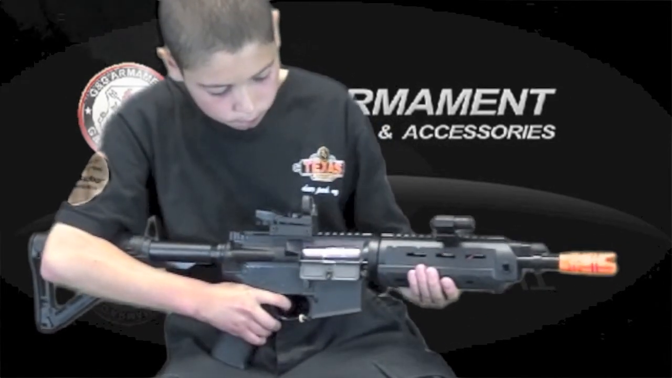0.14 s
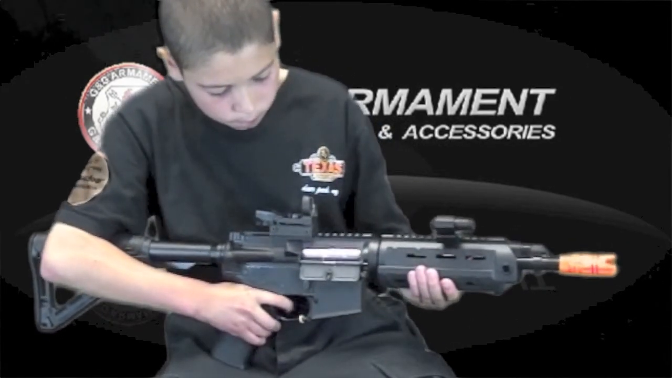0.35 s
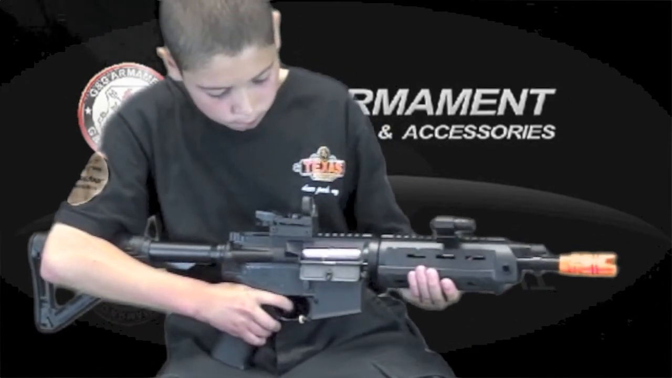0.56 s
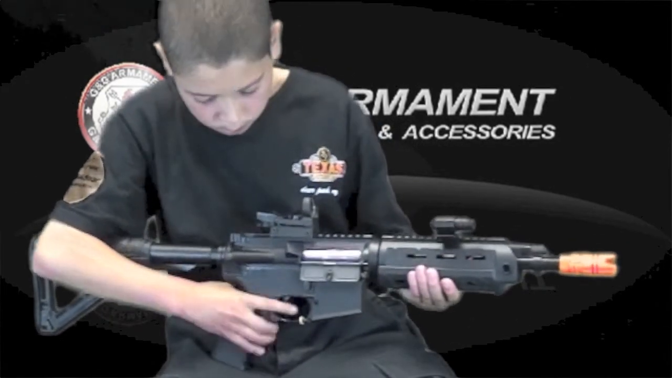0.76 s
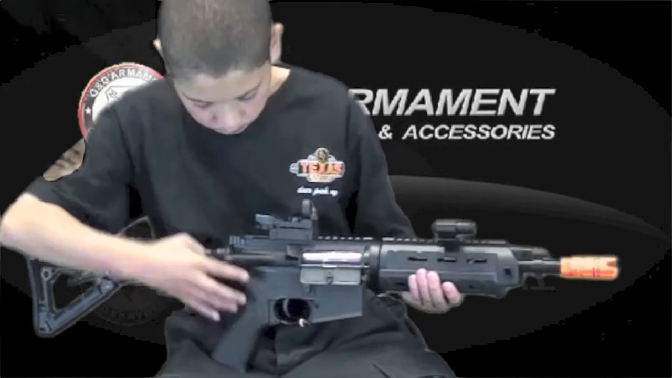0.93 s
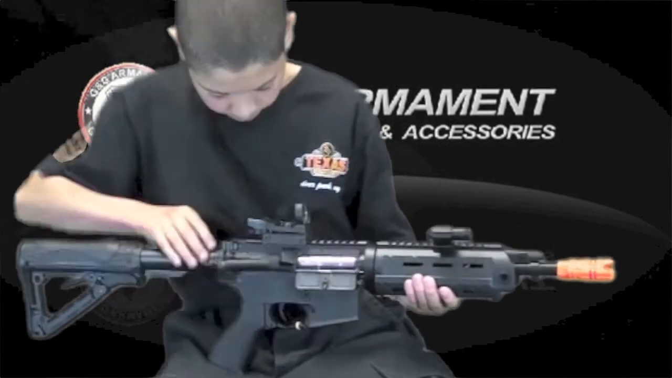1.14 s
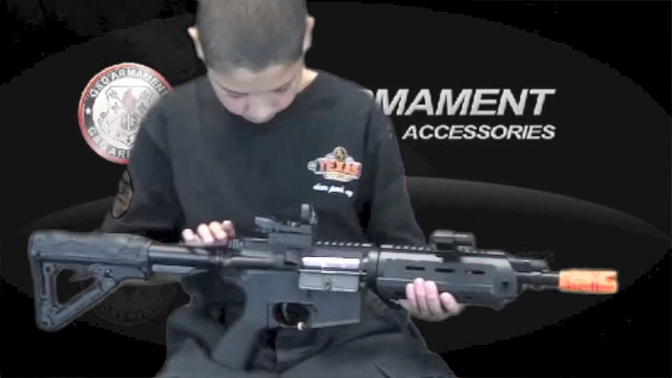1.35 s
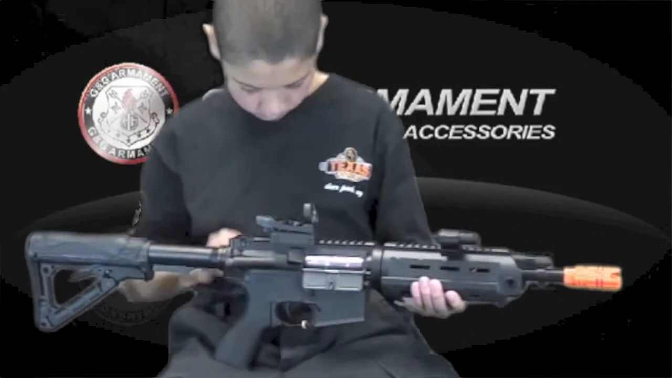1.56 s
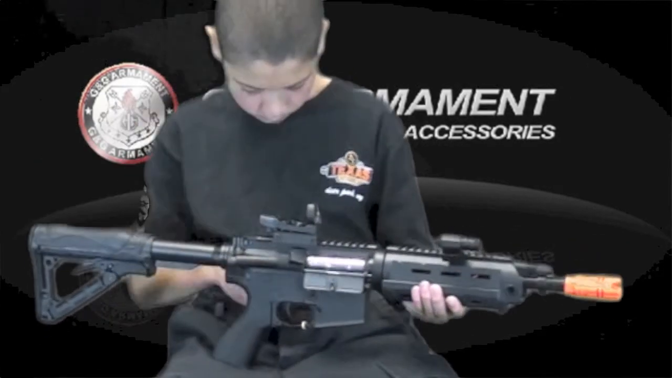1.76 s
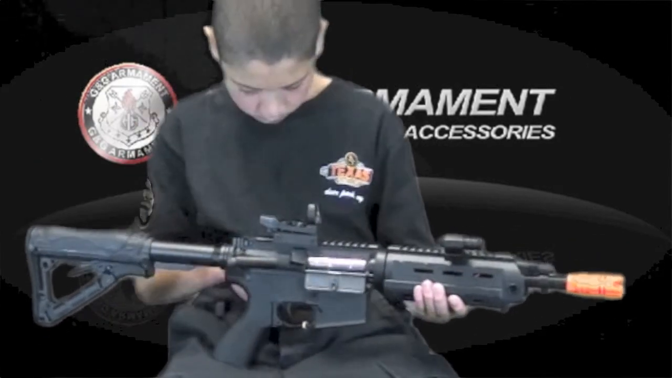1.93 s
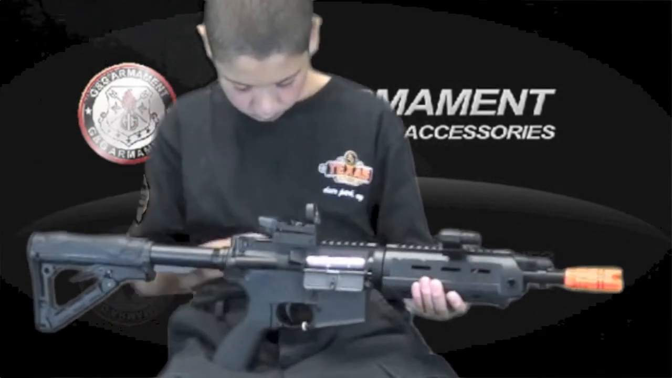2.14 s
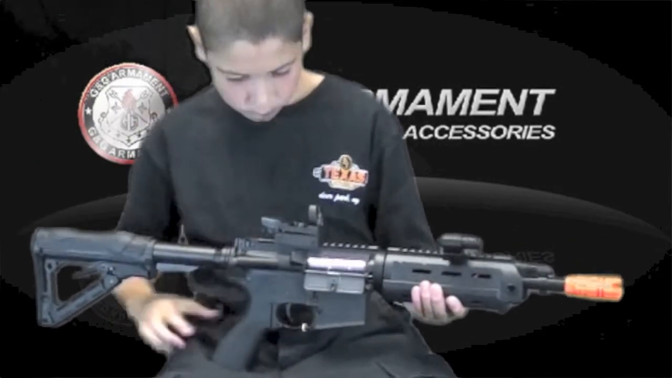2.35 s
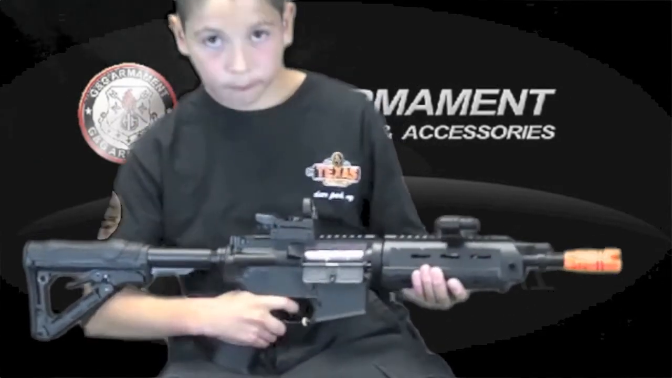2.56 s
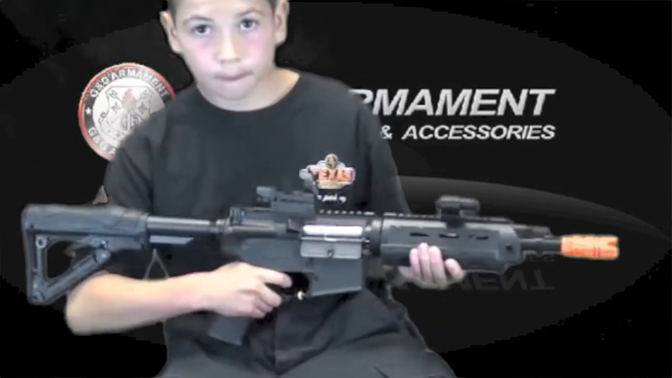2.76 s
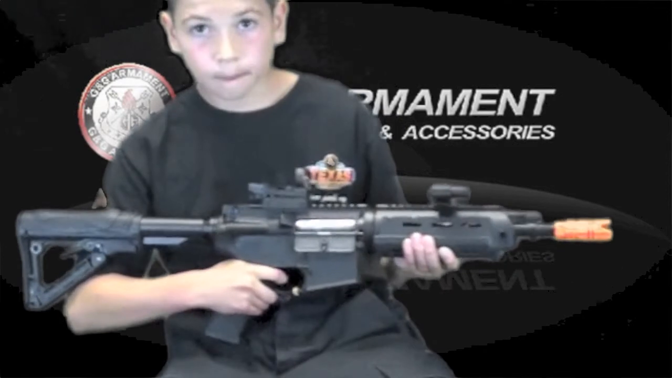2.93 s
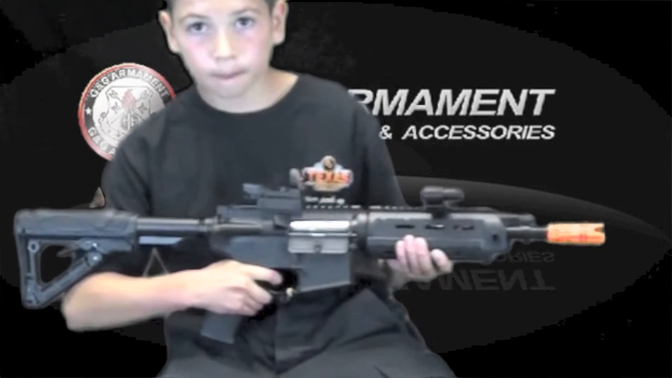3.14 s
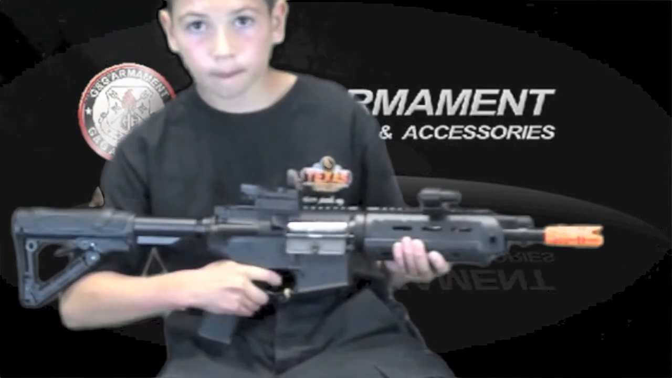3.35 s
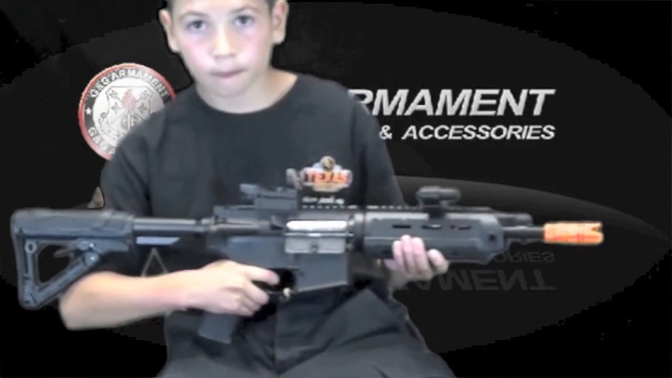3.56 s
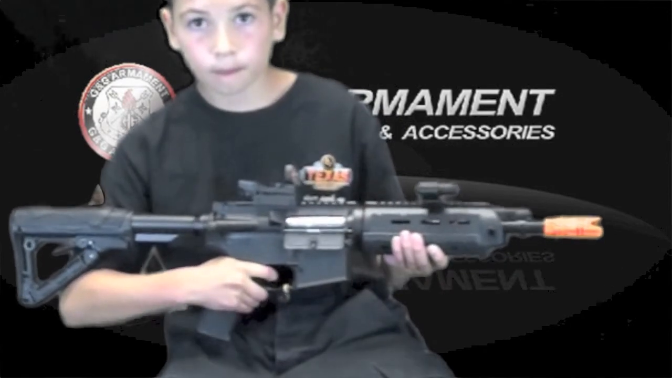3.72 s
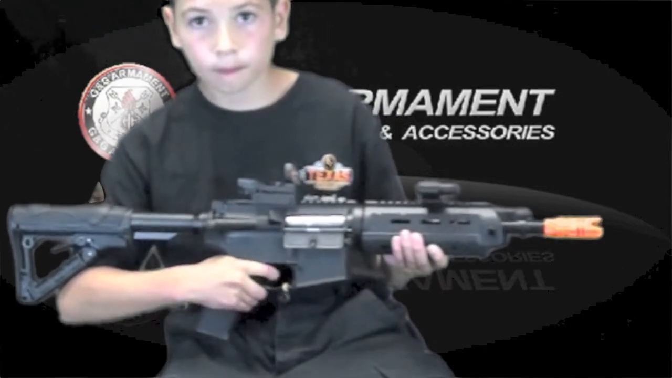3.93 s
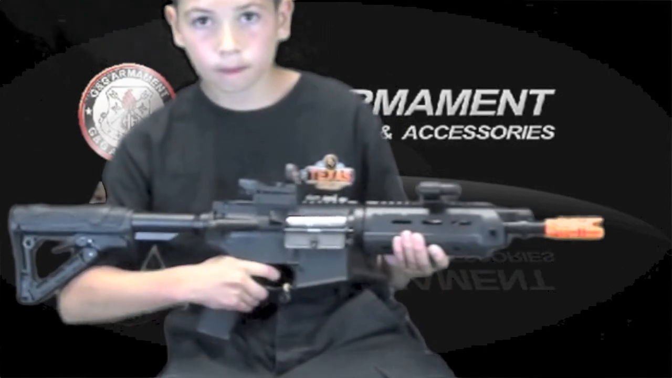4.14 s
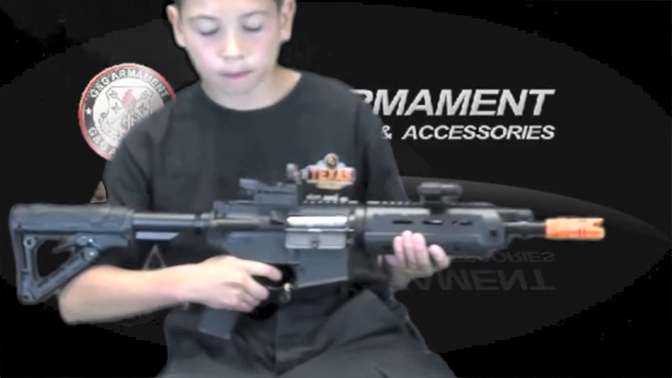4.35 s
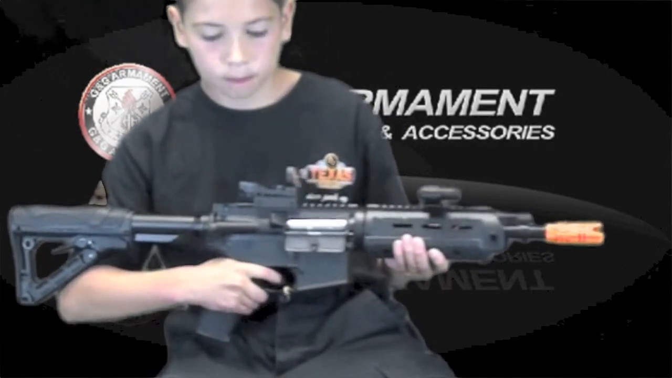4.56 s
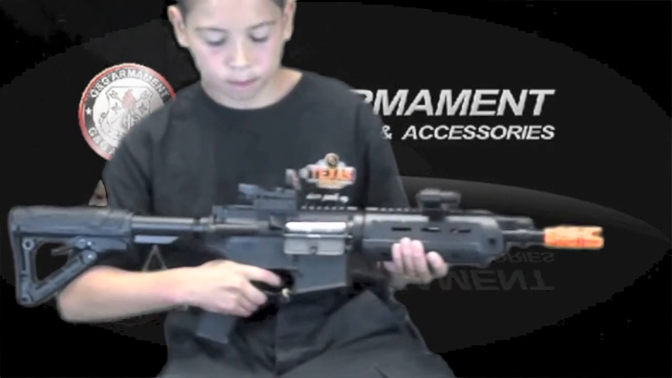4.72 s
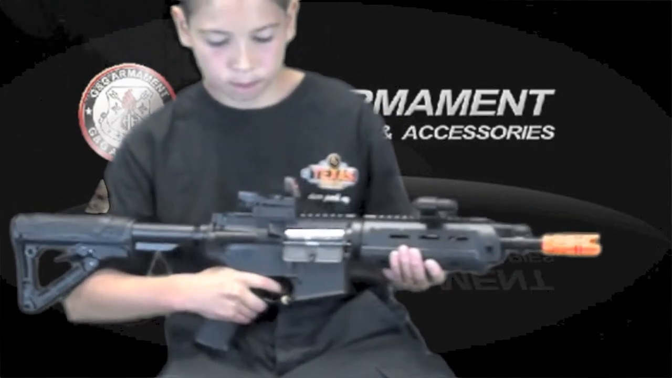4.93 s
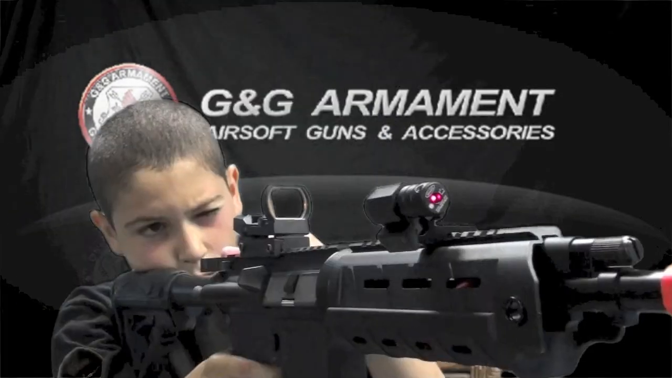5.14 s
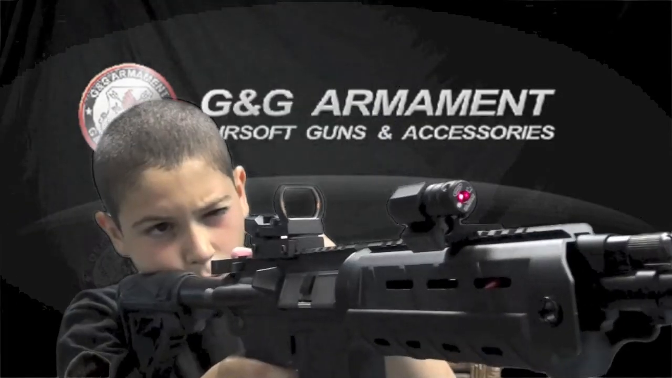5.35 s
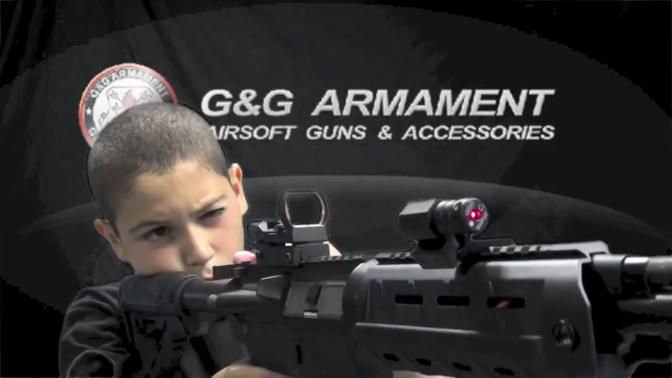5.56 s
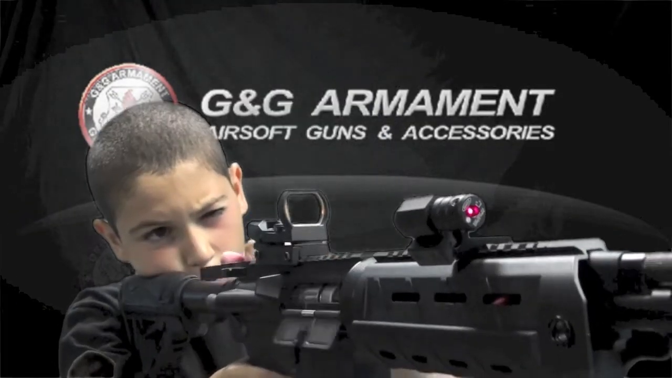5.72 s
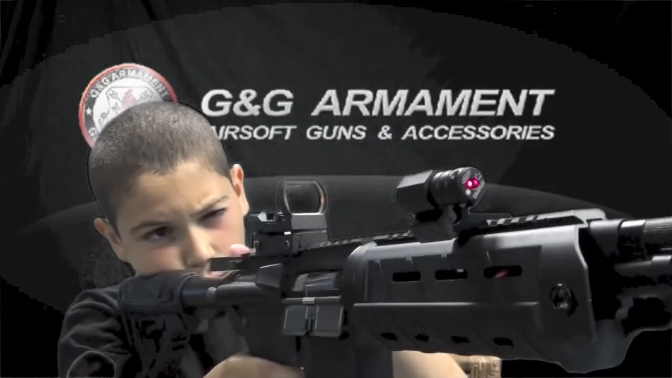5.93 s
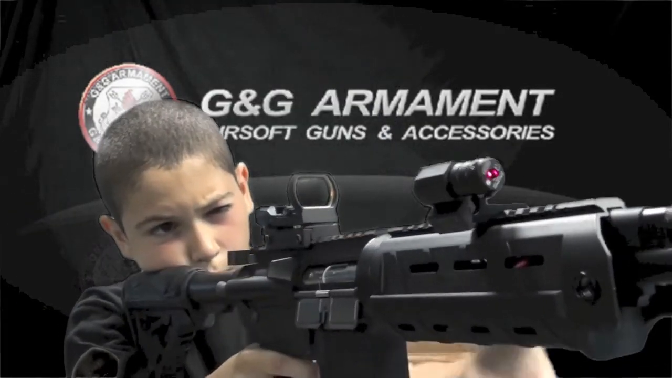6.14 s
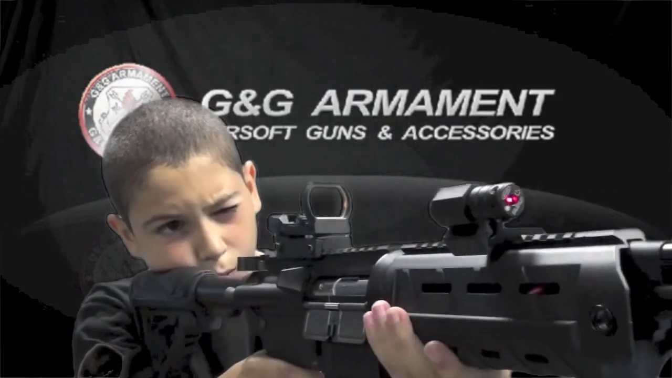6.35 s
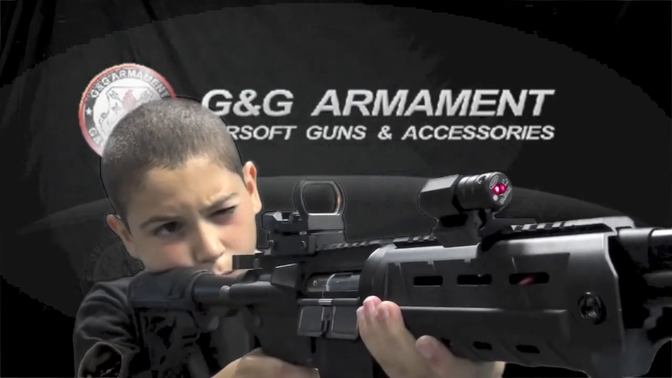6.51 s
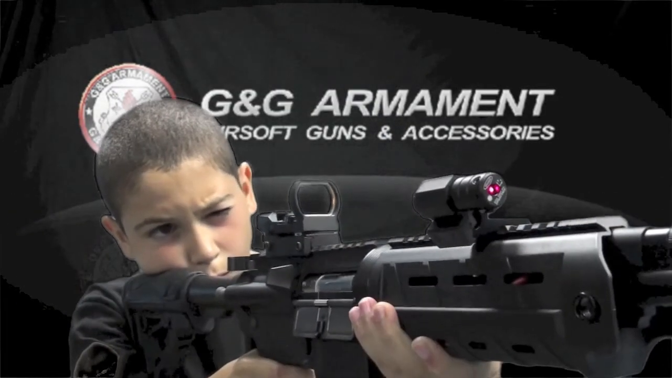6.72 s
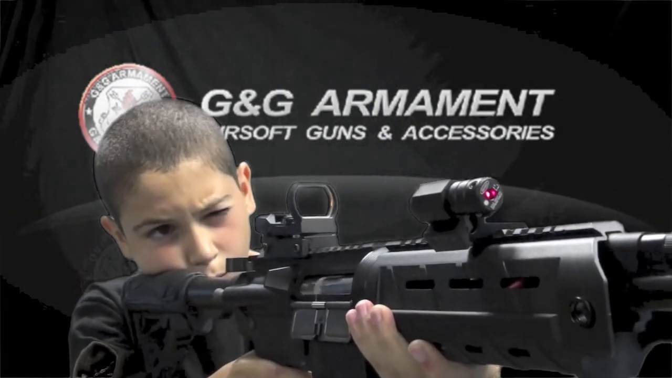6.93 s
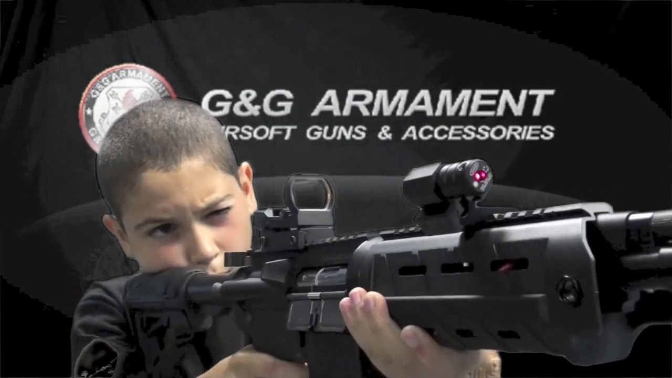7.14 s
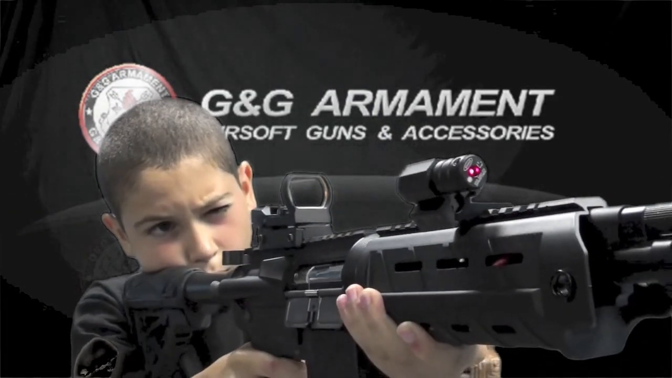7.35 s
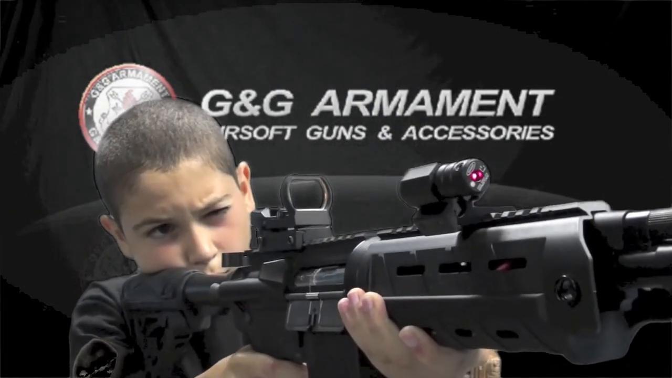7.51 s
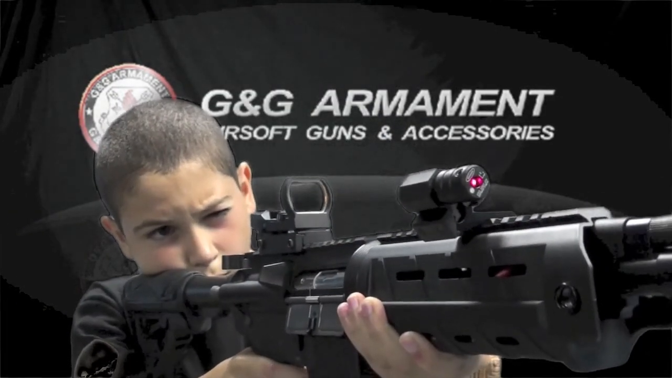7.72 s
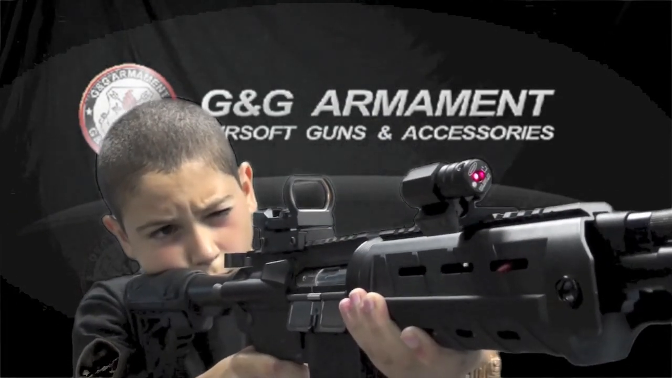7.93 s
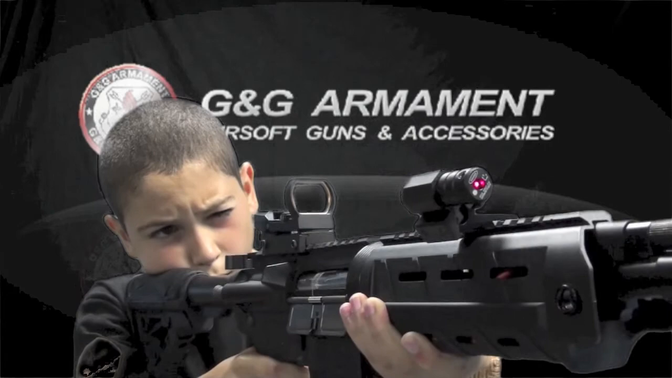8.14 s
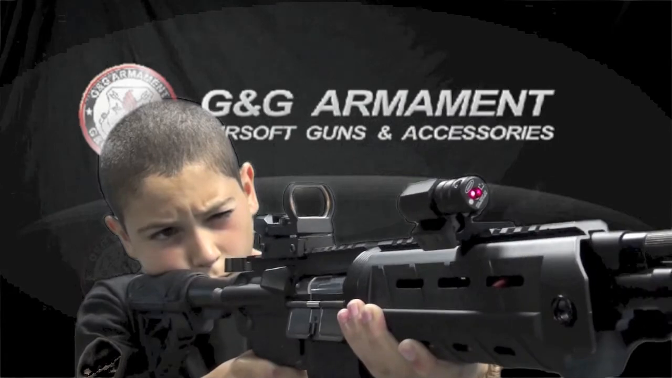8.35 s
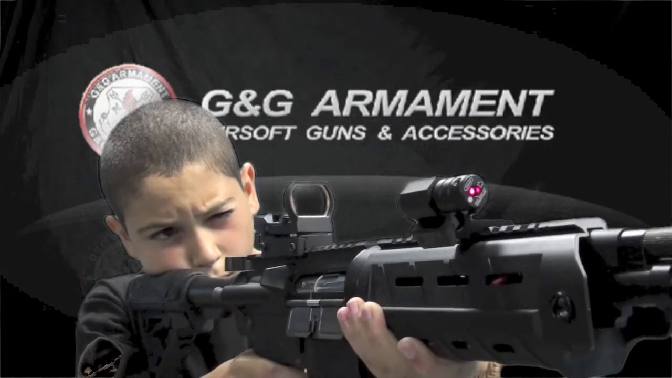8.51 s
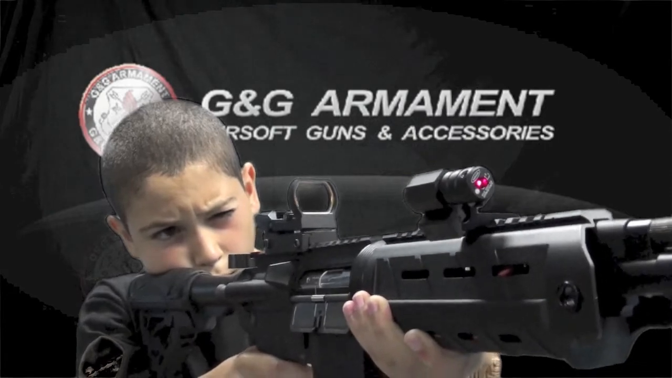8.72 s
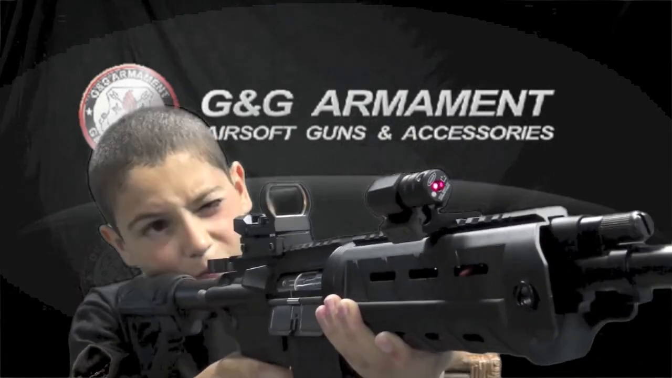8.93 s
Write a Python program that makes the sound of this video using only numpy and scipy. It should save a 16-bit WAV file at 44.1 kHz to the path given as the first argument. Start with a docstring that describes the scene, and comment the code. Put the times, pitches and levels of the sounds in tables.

```python
"""An electric airsoft rifle in a small, faintly noisy room: two single shots, a snap of the selector,
knocks of the hands, automatic bursts and one more single shot. The sound fades out and in, the charging
handle is racked, three more bursts follow, then the motor starts to wind up once more and a short fade
cuts it off. In each cycle gear tones glide with the motor as it sags against the spring; shaped noise
bursts make the piston slam, muzzle puff and small metal parts; decaying sines ring the bodies."""
import sys
import numpy as np
from scipy import signal
from scipy.fft import rfft, irfft, next_fast_len
from scipy.io import wavfile
from scipy.ndimage import uniform_filter1d

SR = 44100
rng = np.random.default_rng(int(sys.argv[2]) if len(sys.argv) > 2 else 0)


def generate_wav(sig):
    """Save sig (samples, or channels by samples) to the path in sys.argv[1] as 16-bit PCM at SR."""
    pcm = np.round(np.clip(np.atleast_2d(sig).T, -1, 1) * 32767).astype(np.int16)
    wavfile.write(sys.argv[1], SR, pcm)


N = 396018
TIME = np.arange(N) / SR
HIT_TIME = np.arange(2 ** 13) / SR   # time axis of one blow


def from_db(db):
    """Decibels to amplitude gain."""
    return 10 ** (np.asarray(db) / 20)


def rms_one(x):
    """Scale to unit power."""
    return x / np.sqrt(np.mean(x ** 2) + 1e-20)


def along(rows, t):
    """The columns of a curve, interpolated at times t."""
    s, *columns = np.transpose(rows)
    return [np.interp(t, s, column) for column in columns]


def at_hz(points, hz):
    """A spectrum read on a log-frequency axis."""
    f, value = np.transpose(points)
    return np.interp(np.log(np.maximum(hz, 1)), np.log(f), value)


def add(out, s, x):
    """Mix x into out from time s."""
    i = round(s * SR)
    out[i:i + len(x)] += x[:len(out) - i]


def drift(rate_hz, size):
    """Smooth random wander of unit rms."""
    steps = np.arange(size) * rate_hz / SR
    return rms_one(np.interp(steps, np.arange(size), rng.standard_normal(size)))


def colour(x, spectrum, tilt_db_per_octave=0):
    """Causal (minimum-phase) filter of unit power gain; the tilt acts above 500 Hz."""
    n = 2 * next_fast_len(len(x) // 2 + 1024)
    hz = np.maximum(np.fft.rfftfreq(n, 1 / SR), 1)
    shape_db = at_hz(spectrum, hz) + tilt_db_per_octave * np.log2(np.maximum(hz, 500))
    cepstrum = irfft(np.log(rms_one(from_db(shape_db))))
    # folding the cepstrum onto positive time gives minimum phase
    cepstrum[1:n // 2] *= 2
    cepstrum[n // 2 + 1:] = 0
    return irfft(rfft(x, n) * np.exp(rfft(cepstrum)))[:len(x)]


def chatter(decay_s, grain_db):
    """A dying flurry of tiny uneven contacts: noise of wandering level, decaying exponentially."""
    size = len(HIT_TIME)
    grains = rms_one(rng.standard_normal(size) * from_db(grain_db * drift(1800, size)))
    return grains * np.exp(-HIT_TIME / max(decay_s, 1e-4))


def ring(x, hz, t60_s):
    """One two-pole mode: a unit click starts a decaying sine of height 1."""
    r = from_db(-60 / (t60_s * SR))
    w = 2 * np.pi * hz / SR
    return signal.lfilter([0, np.sin(w)], [1, -2 * r * np.cos(w), r * r], x + 1e-18)


def modes(x, table):
    """The ringing that x excites in a body."""
    return sum(from_db(mode_db) * ring(x, hz, t60_s) for hz, mode_db, t60_s in table)


# Side-to-mid ratio of diffuse sound. Each row: frequency in Hz, ratio in dB.
WIDTH = [(40, -10), (150, -24.5), (300, -9), (600, -4.5), (1100, 0.5), (2200, -4.5), (8500, -5),
         (12000, -14.5)]


def spread(mid, side):
    """Diffuse stereo: the side signal is weighted by frequency, then added and subtracted."""
    side_gain = from_db(at_hz(WIDTH, np.fft.rfftfreq(len(side), 1 / SR)))
    side = irfft(rfft(side) * side_gain, len(side))
    return np.array([mid + side, mid - side])


# Room noise spectrum. Each row: frequency in Hz, relative density in dB per Hz.
AIR_SPECTRUM = [(15, -48.5), (25, -18), (64, -5), (92, -1), (170, -4.5), (326, -11), (363, -13.5),
                (516, -17), (591, -13), (775, -19), (1070, -19), (1400, -21), (1700, -22.5), (6210, -32.5),
                (16000, -35.5)]
# Room noise before and after the first fade. Each row: time in s, rumble gain in dB, hiss gain in dB.
AIR_GAIN = [(5.05, -49, -48.5), (5.2, -47, -47)]


def air(split_hz=600):
    """Room noise: wide filtered noise split into a low rumble and a faint hiss."""
    noise = spread(*[colour(white, AIR_SPECTRUM) for white in rng.standard_normal((2, N))])
    rumble = signal.sosfilt(signal.butter(1, split_hz, fs=SR, output="sos"), noise)
    hiss = noise - rumble
    rumble_db, hiss_db = along(AIR_GAIN, TIME)
    return rumble * from_db(rumble_db) + hiss * from_db(hiss_db)


SHORTEST_WIND_S = .045   # a wind-up shorter than this is cut off by the fade before any shot
CYCLE_S = .0913   # one shot at full speed
LATE_S, WARM_UP_S = .058, .035   # the shorter the first wind-up, the later the second shot


def shot_times(start, first, last):
    """Shots of one pull: evenly spaced from the second on, once the motor is up to speed."""
    if first - start < SHORTEST_WIND_S:
        return []
    second = first + CYCLE_S + LATE_S * np.exp(-(first - start) / WARM_UP_S)
    later = round((last - first) / CYCLE_S)
    return [first, *np.linspace(last, second, later)[::-1]]


START_SHARE, TOP_S, RISE_BEND, START_SAG_PER_S = .15, .066, 1.85, 2.9   # shares of top pitch
FORCE_PER_DECADE_DB = 30.5   # the gears grow louder with speed
# Gears rattle first and sing under load. Each row: time after the pull in s, tone gain in dB.
START_SING = [(0, -1.5), (.035, 1.5), (.06, 1.5)]


def spin_up(t, wind_s, top_hz, wind_db):
    """From rest the motor gathers speed until the spring drags it back; a part-wound spring checks it sooner."""
    part = wind_s / CYCLE_S
    top_s = TOP_S * np.sqrt(part)
    rise = np.maximum(1 - t / top_s, 0) ** (RISE_BEND / min(part, 1))
    share = 1 - (1 - START_SHARE) * rise - START_SAG_PER_S * np.maximum(t - top_s, 0)
    share = np.maximum(share, .01)
    level_db = wind_db + FORCE_PER_DECADE_DB * np.log10(share)
    return top_hz * share, level_db, along(START_SING, t)[0]


# mesh pitch at the release, pitch it recovers towards, recovery time, pitch lost to the spring
LOADED_HZ, FREE_HZ, RECOVER_S, SPRING_SAG_HZ = 1460, 2397, .009, 825.4
SLACK_DB, TAKE_UP_S = -14, 0.011   # the gears run light just after a shot
CUT_S, BRAKE_S, RUN_OUT_DB_PER_S = .04, 0.051, 287.5   # power cut after the last shot, then braking
# Gears sing more as load builds. Each row: time after a shot in s, tone gain in dB.
CYCLE_SING = [(0, -11), (.05, 4.5)]


def cycle(t, length_s, is_last):
    """Freed by a shot, the motor races, then sags as the spring tightens, or runs out after the last one."""
    tension = np.minimum(t / length_s, 1)
    hz = FREE_HZ - (FREE_HZ - LOADED_HZ) * np.exp(-t / RECOVER_S) - SPRING_SAG_HZ * tension ** 2
    level_db = SLACK_DB * np.exp(-t / TAKE_UP_S)
    if is_last:
        hz = hz * np.exp(-np.maximum(t - CUT_S, 0) / BRAKE_S)
        return hz, level_db - RUN_OUT_DB_PER_S * t, np.full(len(t), -5.0)
    return hz, level_db, along(CYCLE_SING, t)[0]


PISTON_FLIGHT_S = 0.0035


def motor_motion(start, first, last, top_hz, wind_db, t):
    """Mesh pitch, gear force and tone gain through one pull: spin-up, one cycle a shot, run-out."""
    times = shot_times(start, first, last)
    motion = spin_up(t - start, first - start, top_hz, wind_db)
    engaged = np.ones(len(t)) if times else 1. * (t < last)
    for s, following in zip(times, times[1:] + [last + CYCLE_S]):
        running = cycle(np.maximum(t - s, 0), following - s, s == times[-1])
        motion = np.where(t < s, motion, running)
        # the gears fall slack while the released piston flies forward
        engaged[(t > s - PISTON_FLIGHT_S) & (t < s)] = from_db(-18.5)
    mesh_hz, level_db, sing_db = motion
    return mesh_hz, from_db(level_db) * uniform_filter1d(engaged, size=40), sing_db


# Trigger pulls. Each row: start in s, first shot in s, last shot in s, coasting time in s,
# top gear-mesh pitch of the first wind-up in Hz, extra force in that wind-up in dB, whine gain in dB,
# whine tilt in dB per octave, gear rattle gain in dB, muzzle crack gain in dB.
PULLS = [(0.072, 0.176, .177, 0.079, 1502, 2.5, -4.5, -1.5, 0.5, 0.5),
         (0.453, .5574, .5574, 0.1, 1482, 2.5, -2.5, -1.5, 3.5, -2),
         (2.756, 2.862, 3.228, 0.082, 1496, 2.5, 0, -1, 4.5, -4.5),
         (3.617, 3.71, 3.807, .11, 1367, 0.5, 1, -1, 4, 10),
         (4.243, 4.315, 4.312, .11, 1060, 3, -6, -2.5, 0, 10.5),
         (6.604, 6.669, 6.949, 0.073, 1034, 5.5, 2.5, 1, 6.5, 15.5),
         (7.302, 7.395, 7.587, .092, 1391, 3, 3, 1, 7.5, 17.5),
         (7.841, 7.939, 8.488, .105, 1400, 0.5, 2.5, .5, 9, 18.5),
         (8.789, 8.819, 8.812, 0.016, 997, -1, -15.5, -1, -11.5, 0)]
# Gearbox radiation of a gear tone. Each row: frequency in Hz, relative level in dB.
GEARBOX = [(400, -25), (900, -15.5), (1120, -26), (1450, -13.5), (1720, -29), (2110, -18), (2400, -27),
           (2900, -16.5), (3200, -19), (3750, -17.5), (4250, -23.5), (4700, -18), (5900, -25.5),
           (8000, -25), (14000, -46)]
# Gear rattle spectrum. Each row: frequency in Hz, relative density in dB per Hz.
RATTLE = [(100, -40.5), (300, -17), (600, -9), (1000, -4), (2000, -6), (4000, 2), (5500, 0.5), (8000, -7.5),
          (10500, -10.5), (12500, -9.5), (16000, -18.5)]


def gears(jitter=0.015, wobble=0.074, rough_db=4.0, grain_db=0.6, rattle_db=-19.0, soften_db=1.5,
          overtone_db=1.6):
    """Meshing teeth give a gliding stack of tones and a rattle; both beat with the motor shaft."""
    out = np.zeros(N)
    for start, first, last, _, top_hz, wind_db, whine_db, tilt_db, noise_db, _ in PULLS:
        t = start + TIME[:int(.85 * SR)]
        size = len(t)
        mesh_hz, force, sing_db = motor_motion(start, first, last, top_hz, wind_db, t)
        force = force * np.clip((t[-1] - t) / .02, 0, 1)
        tooth = 2 * np.pi * np.cumsum(mesh_hz * (1 + jitter * drift(500, size))) / SR
        shaft = 1 + wobble * np.sin(tooth / 10)   # ten teeth on a slightly eccentric pinion
        racing = np.clip((mesh_hz - 1500) / 400, 0, 1)   # at speed the teeth meet more gently
        whine = 0
        for k in range(1, 7):
            hz = k * mesh_hz
            tone_db = at_hz(GEARBOX, hz) + tilt_db * np.log2(hz / 2500) + rough_db * drift(300, size)
            tone_db -= max(k - 3, 0) * overtone_db + max(k - 2, 0) * soften_db * racing
            tone_gain = np.sqrt(2) * from_db(tone_db + whine_db + sing_db)
            whine = whine + tone_gain * np.sin(k * tooth + 2 * np.pi * rng.random())
        contacts = rng.standard_normal(size) * (1 + 0.54 * np.cos(tooth))
        contacts = contacts * from_db(grain_db * drift(700, size))
        rattle = from_db(rattle_db + noise_db) * colour(rms_one(contacts), RATTLE)
        add(out, start, force * shaft * (whine + rattle))
    return out


def shots():
    """Every shot: time in s, muzzle crack gain in dB."""
    return [(s, pull[-1]) for pull in PULLS for s in shot_times(*pull[:3])]


THRUM_HZ, THRUM_DIP_HZ, DIP_AT_S, DIP_S = 350.3, 106.5, .015, .011
THRUM_DB, THRUM_ATTACK_S, THRUM_HOLD_S, THRUM_RELEASE_S = -24.5, 0.001, .036, 0.006


def spring():
    """The freed spring thrums: its pitch drops as it unloads and rises again as it settles."""
    hz = THRUM_HZ - THRUM_DIP_HZ * np.exp(-((HIT_TIME - DIP_AT_S) / DIP_S) ** 2)
    attack = np.minimum(HIT_TIME / THRUM_ATTACK_S, 1)
    release = np.exp(-np.maximum(HIT_TIME - THRUM_HOLD_S, 0) / THRUM_RELEASE_S)
    thrum = np.sin(2 * np.pi * np.cumsum(hz) / SR)
    return np.sqrt(2) * from_db(THRUM_DB) * attack * release * thrum


# The rifle is held low, raised side-on, then turned towards the listener.
# Each row: time in s, thrum gain in dB, shell and catch gain in dB, muzzle puff gain in dB.
AIM = [(.6, -1.5, -1, -48.5), (2.8, 1, 0, -42), (4.4, 0, 1.5, -46), (6.6, -3, 1.5, -41.5)]
# Spectra of slam and pop, shaking shell, gear catch. Each row: frequency in Hz, relative density in dB per Hz.
CRACK = [(30, -17.5), (110, -13), (250, -1), (420, -11.5), (600, 6.5), (950, 3), (1500, 3), (3000, -10),
         (6000, -9.5), (10000, -31), (16000, -19.5)]
SHELL = [(50, -28), (100, -18.5), (155, -3), (260, 2.5), (400, -5), (560, 2.5), (700, -0.5), (900, 1),
         (1400, 1.5), (2500, 1.5), (4800, -0.5), (7500, -1.5), (10000, -7), (12300, -2), (16000, -19.5)]
CLACK = [(100, -21.5), (400, -0.5), (1000, -2), (2500, -1), (4500, 2), (7500, 0.5), (10000, -3),
         (12500, -1.5), (16000, -10.5)]


def piston(pop_lag_s=0.0022, catch_s=.042, crack_db=-3.0, shell_db=-7.5, clack_db=-7):
    """Each shot: piston slam, muzzle pop, shaking shell, spring thrum, and the gear catching the piston again."""
    out, thrum = np.zeros(N), spring()
    same_shake = chatter(decay_s=0.048, grain_db=1.5)   # the same parts shake much alike every time
    for s, snap_db in shots():
        thrum_db, shake_db, _ = along(AIM, s)
        blows = 0.078 * chatter(decay_s=0.0071, grain_db=13.0)
        add(blows, 0, np.array([.8]))   # slam
        add(blows, pop_lag_s, np.array([1.0]))   # pop
        add(out, s, from_db(crack_db + snap_db) * colour(blows, CRACK))
        add(out, s, from_db(thrum_db) * thrum)
        shake = 0.97 * same_shake + 0.58 * chatter(decay_s=0.037, grain_db=2)
        add(out, s, from_db(shake_db + shell_db) * colour(shake, SHELL))
        catch = colour(chatter(decay_s=0.017, grain_db=1.5), CLACK)
        add(out, s + catch_s, from_db(shake_db + clack_db) * catch)
    return out


# Muzzle puff spectrum. Each row: frequency in Hz, relative density in dB per Hz.
PUFF = [(25, -2), (55, 4.5), (110, -4), (200, 1.5), (600, -25), (4000, -52.5)]


def muzzle(decay_s=0.0073):
    """A soft, deep puff of air at each shot: a short burst of low noise."""
    out = np.zeros(N)
    for s, _ in shots():
        _, _, puff_db = along(AIM, s)
        add(out, s, from_db(puff_db) * colour(chatter(decay_s, grain_db=2.0), PUFF))
    return out


# Metal receiver, close modes near 4.7 kHz. Each row: frequency in Hz, gain in dB, T60 in s.
RECEIVER = [(2680, -49, .06), (4560, -55, .16), (4640, -53, .2), (4705, -55, .2), (4780, -52, .18),
            (4860, -53, .15), (6830, -52, .05), (12300, -42, .02)]


def receiver(firing):
    """The metal receiver rings when the firing mechanism shakes it."""
    return modes(firing, RECEIVER)


# Spectrum of small metal parts. Each row: frequency in Hz, relative density in dB per Hz.
LATCH = [(100, -34), (400, -9.5), (800, -5), (1200, 1.5), (2000, 3), (3000, -1), (4700, 1), (7000, -0.5),
         (10000, -3.5), (13000, -4.5), (16000, -31.5)]


def click(level_db, decay_s, tilt_db_per_octave, first_contact=5.2):
    """One small metal part strikes another: a sharp contact and a dying chatter."""
    contacts = chatter(decay_s, grain_db=1.0) + first_contact * (HIT_TIME == 0)
    return from_db(level_db) * colour(contacts, LATCH, tilt_db_per_octave)


def gear_latch():
    """The latch catches the gears as they coast to a stop."""
    out = np.zeros(N)
    for start, first, last, coast_s, *_ in PULLS:
        if shot_times(start, first, last):
            add(out, last + coast_s, click(level_db=-13.5, decay_s=.006, tilt_db_per_octave=-3.0))
    return out


CONTACT_S, REBOUND_S = .002, .004   # decay of the first contact; delay of the rebound
SETTLE_S, SETTLE_DB = .015, -12.5   # delay and relative gain of a last small bounce
# Snaps of selector, charging handle and trigger. Each row: time in s, gain in dB, rebound gain in dB,
# rebound decay time in s, tilt in dB per octave.
SNAPS = [(2.02, -40.5, -32.5, .012, -0.5), (2.069, -6, -7.5, .0036, 0.5), (5.662, -19, -28, 0.0068, -2.5),
         (5.732, -8.5, -6.5, 0.0095, 1.5), (5.7685, -5.5, -9, 0.019, 0), (5.8007, -4.5, -21.5, 0.0051, 0.5),
         (6.0005, -6.5, -4.5, 0.016, 1), (6.606, -24, -23.5, 0.0067, -5)]


def metal_snaps():
    """Small metal parts snap home, rebound and settle."""
    out = np.zeros(N)
    for s, level_db, rebound_db, decay_s, tilt_db in SNAPS:
        add(out, s, click(level_db, CONTACT_S, tilt_db))
        add(out, s + REBOUND_S, click(rebound_db, decay_s, tilt_db))
        add(out, s + SETTLE_S, click(level_db + SETTLE_DB, CONTACT_S, tilt_db_per_octave=0.5))
    return out


# Knocks of the hands. Each row: time in s, gain in dB, decay time in s.
TOUCHES = [(2.426, -49, 0.01), (2.511, -48.5, 0.058), (2.591, -39, 0.0085), (6.275, -35.5, 0.004),
           (6.318, -39, 0.019), (6.519, -39, 0.0021)]
# Handguard mode. Each row: frequency in Hz, gain in dB, T60 in s.
HANDGUARD = [(1800, -31.5, .04)]


def touches():
    """Hands knock on the hollow handguard, which rings."""
    knocks = np.zeros(N)
    for s, level_db, decay_s in TOUCHES:
        add(knocks, s, click(level_db, decay_s, tilt_db_per_octave=-2.0))
    return knocks + modes(knocks, HANDGUARD)


STROKE_ATTACK_S, SWELL_DB_PER_S, STROKE_RELEASE_DB_PER_S = 0.015, 171.5, 701.5
# Strokes of the charging handle. Each row: start in s, end in s, gain at the end in dB.
STROKES = [(5.63, 5.658, -33), (5.765, 5.817, -13.5), (5.944, 6.011, -19.5)]


def stroke_gain():
    """Each stroke of the handle swells as it gathers speed and dies at its stop."""
    gain = 0
    for start, end, level_db in STROKES:
        attack = np.clip((TIME - start) / STROKE_ATTACK_S, 0, 1)
        drop_db = np.maximum(SWELL_DB_PER_S * (end - TIME), STROKE_RELEASE_DB_PER_S * (TIME - end))
        gain = gain + attack * from_db(level_db - drop_db)
    return gain


# Rail scrape spectrum. Each row: frequency in Hz, relative density in dB per Hz.
RAIL = [(100, -30), (400, -15), (750, -15), (1350, 8), (2000, 2.5), (3000, -4.5), (6500, -3.5), (10000, -5),
        (16000, -12)]


def handle_scrape(grain_db=4.0):
    """The charging handle scrapes along its rail: grainy friction noise."""
    friction = rms_one(rng.standard_normal(N) * from_db(grain_db * drift(430, N)))
    return colour(friction * stroke_gain(), RAIL)


# Hollow upper housing. Each row: frequency in Hz, gain in dB, T60 in s.
HOUSING = [(1310, -49.5, 0.055), (1489, -42.5, 0.12), (1930, -56, 0.023)]


def housing(snaps):
    """The hollow housing rings under the blows of the handle only."""
    racking = (TIME > STROKES[0][0]) & (TIME < STROKES[-1][1] + .05)
    return modes(snaps * racking, HOUSING)


PING_S = 6.003   # the handle snaps home
# Return spring of the handle. Each row: frequency in Hz, gain in dB, T60 in s.
RETURN_SPRING = [(4457, -50.5, .5), (4570, -42, .6), (4537, -48.5, 0.71), (5351, -48, .35), (3585, -44, .2)]


def return_spring():
    """The handle's return spring pings: one click starts its modes."""
    impulse = 1. * (np.arange(N) == round(PING_S * SR))
    return modes(impulse, RETURN_SPRING)


def handling():
    """Snaps of the small parts, with the handle's scrape, its spring and the housing."""
    snaps = metal_snaps()
    return snaps + handle_scrape() + housing(snaps) + return_spring()


# Reverberation. Each row: frequency in Hz, T60 in s.
ROOM_T60 = [(100, 1), (260, 0.63), (700, 0.31), (1840, 0.31), (4850, 0.45), (12800, 0.3)]
# Nearby surfaces. Each row: delay in s, echo gain in dB.
ECHOES = [(.0039, -31.5), (.0063, -21.5), (.0083, -17.5), (0.0162, -24.5)]


def room(x, wet_db=-11.0, build_s=0.0024):
    """Direct sound, a few near echoes and a tail that dies band by band."""
    t = TIME[:SR * 3 // 4]
    white, tail = rng.standard_normal((2, len(t))), 0
    edges_hz = np.geomspace(40, 19000, 10)
    for low, high in zip(edges_hz, edges_hz[1:]):
        band_filter = signal.butter(2, [low, high], "band", fs=SR, output="sos")
        band = signal.sosfilt(band_filter, rng.permuted(white, axis=1))
        tail = tail + band * from_db(-60 * t / at_hz(ROOM_T60, np.sqrt(low * high)))
    tail = tail * (1 - np.exp(-t / build_s))
    response = from_db(wet_db) * spread(*tail / np.sqrt(np.sum(tail[0] ** 2)))
    response[:, 0] += 1   # direct sound
    for s, echo_db in ECHOES:
        response[:, round(s * SR)] += from_db(echo_db)
    return signal.fftconvolve(x[None], response, axes=1)[:, :N]


# Stereo balance of the rifle. Each row: frequency in Hz, left minus right in dB.
LEAN = [(60, -1), (150, 2), (380, -0.5), (950, -2.5), (2380, 0), (5980, -0.5), (15000, 0)]


def scene():
    """The rifle in the room, its left-right balance varying with frequency, over the room noise."""
    firing = gears() + piston() + muzzle()
    heard = room(firing + receiver(firing) + gear_latch() + handling() + touches())
    n = next_fast_len(N)
    lean_db = at_hz(LEAN, np.fft.rfftfreq(n, 1 / SR)) * [[.5], [-.5]]
    rifle = irfft(rfft(heard, n) * from_db(lean_db - 2.0), n)[:, :N]
    return rifle + air()


def compressor(x, threshold_db, strength, attack_s, release_db_per_s):
    """Turns loud stretches down and recovers at a steady rate."""
    power = uniform_filter1d(np.mean(x ** 2, axis=0), size=220)
    over_db = np.maximum(10 * np.log10(np.abs(power) + 1e-12) - threshold_db, 0)
    release_db = release_db_per_s * TIME
    held_db = np.maximum.accumulate(over_db + release_db) - release_db
    r = np.exp(-1 / (attack_s * SR))
    smooth_db = signal.lfilter([1 - r], [1, -r], held_db)
    return x * from_db(-np.clip(strength, 0, 1) * smooth_db)


CUTOFF_HZ = 15900
# Fades of the whole sound. Each row: lowest point in s, fade-out in s, fade-in in s.
FADES = [(5.115, 0.1, 0.063), (8.826, 0.019, 0.12)]


def record(dry):
    """Slow gain control that ducks the room after bursts, quick compression, fades, rounded peaks, steep top cut."""
    levelled = compressor(dry, threshold_db=-13.5, strength=0.65, attack_s=0.21, release_db_per_s=4.0)
    faded = compressor(levelled, threshold_db=-12.0, strength=.35, attack_s=.0005, release_db_per_s=149.5)
    for s, out_s, in_s in FADES:
        faded = faded * np.clip(np.maximum((s - TIME) / out_s, (TIME - s) / in_s), .015, 1)
    rounded = faded / (1 + (faded / .98) ** 4) ** (1 / 4)
    return signal.sosfilt(signal.ellip(10, .1, 90, CUTOFF_HZ, fs=SR, output="sos"), rounded)


dry = scene()
out = record(dry)
generate_wav(out)
```